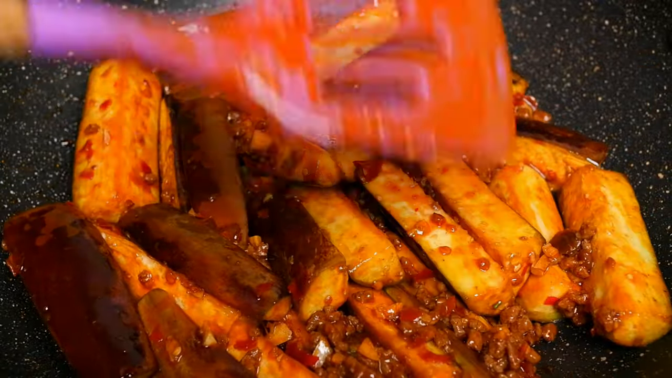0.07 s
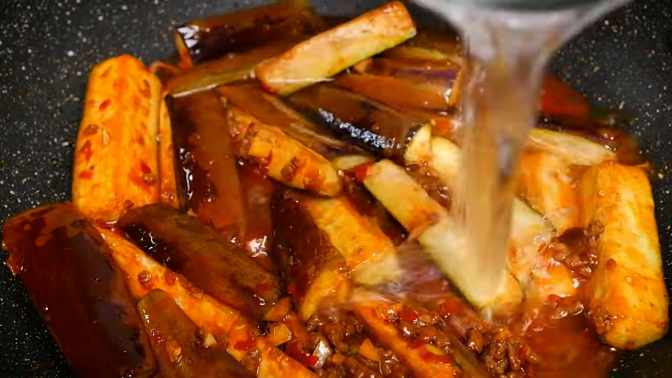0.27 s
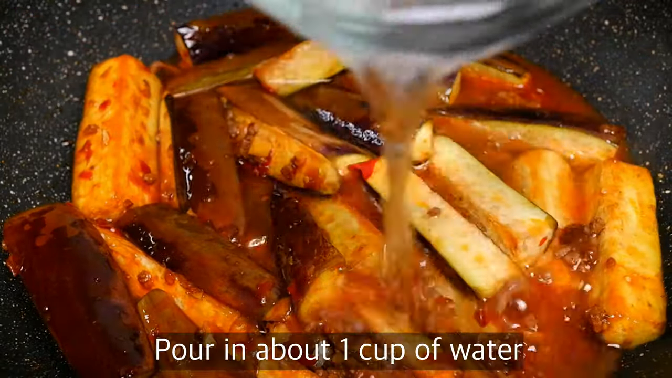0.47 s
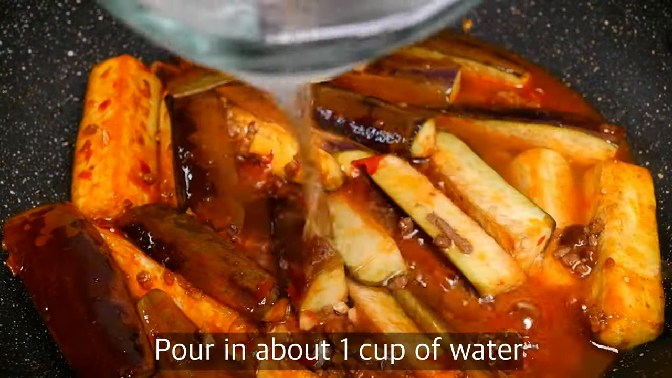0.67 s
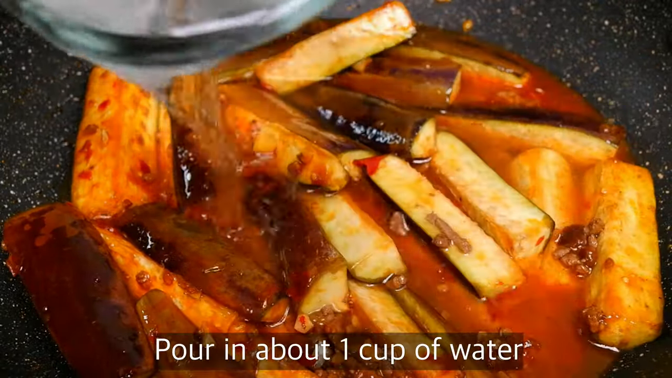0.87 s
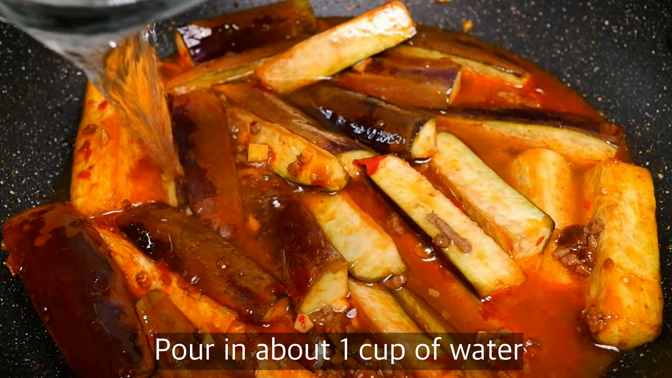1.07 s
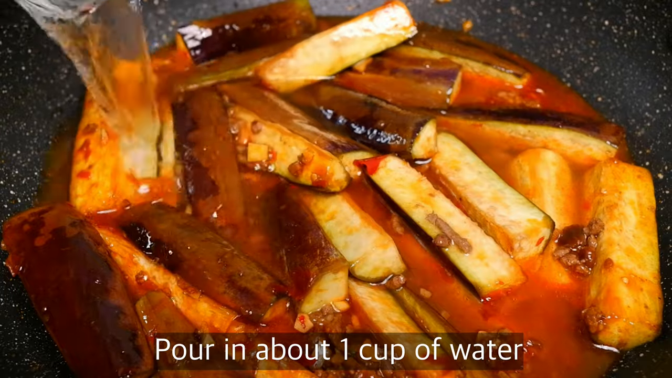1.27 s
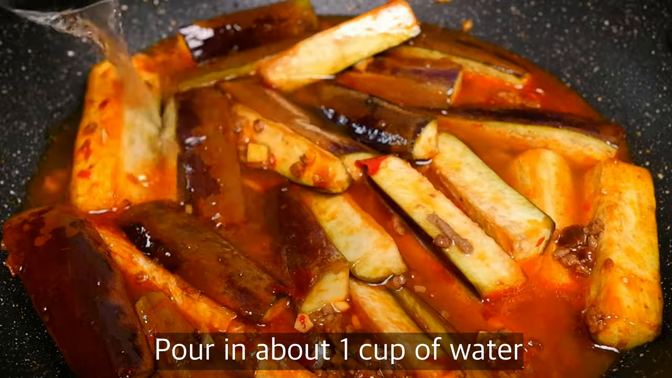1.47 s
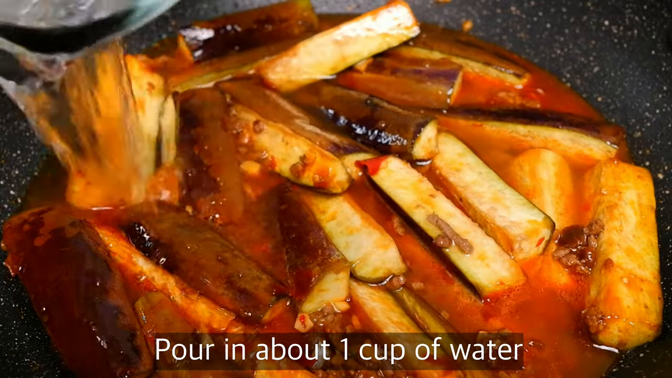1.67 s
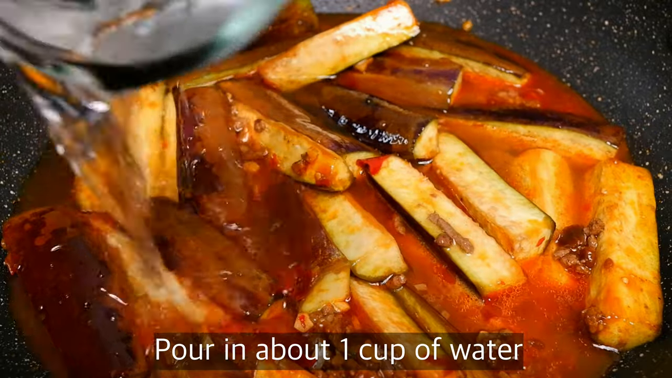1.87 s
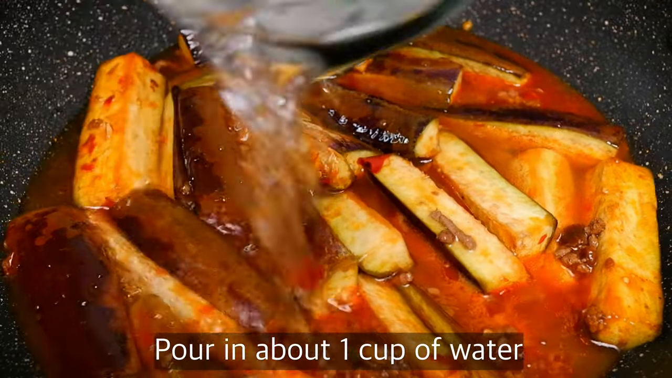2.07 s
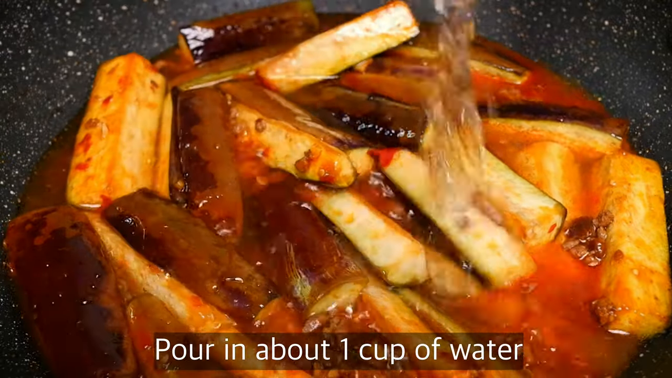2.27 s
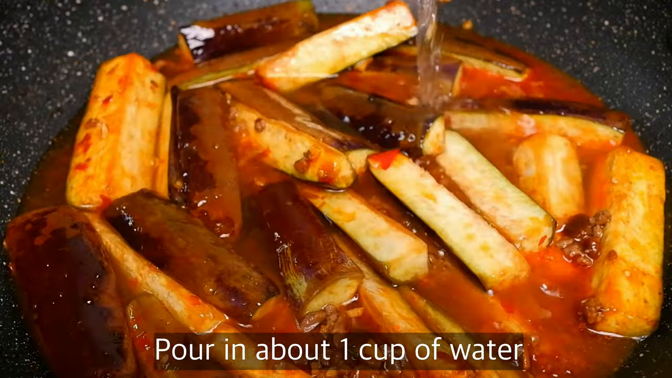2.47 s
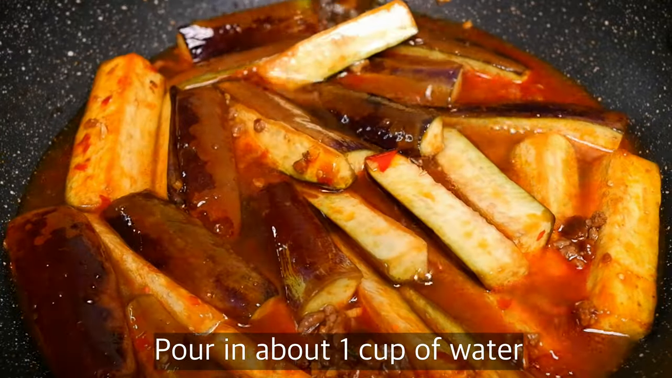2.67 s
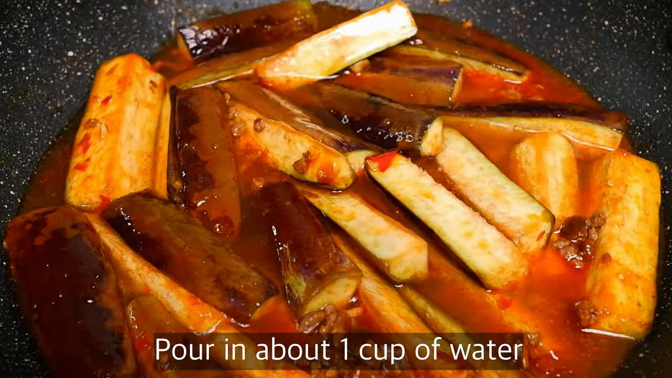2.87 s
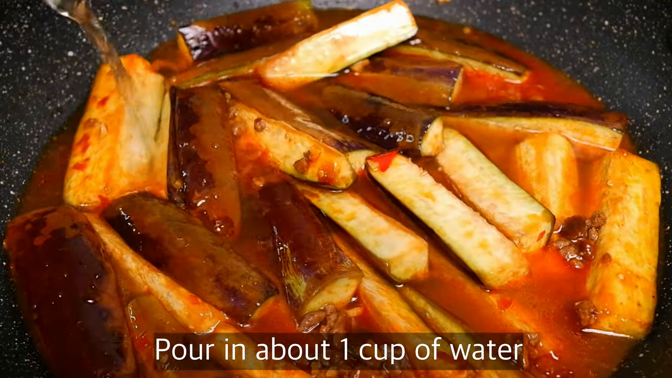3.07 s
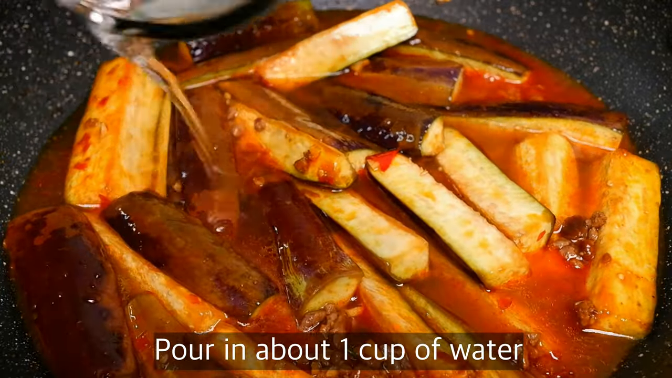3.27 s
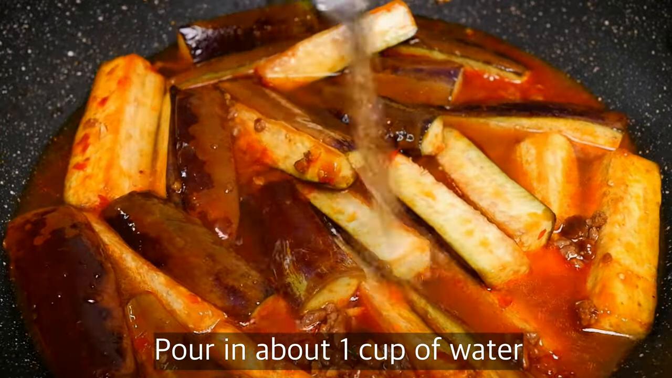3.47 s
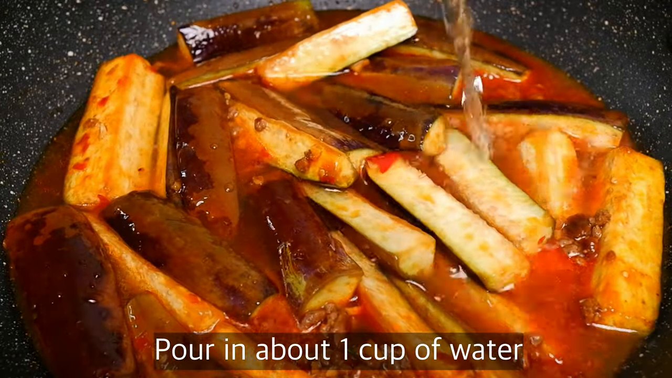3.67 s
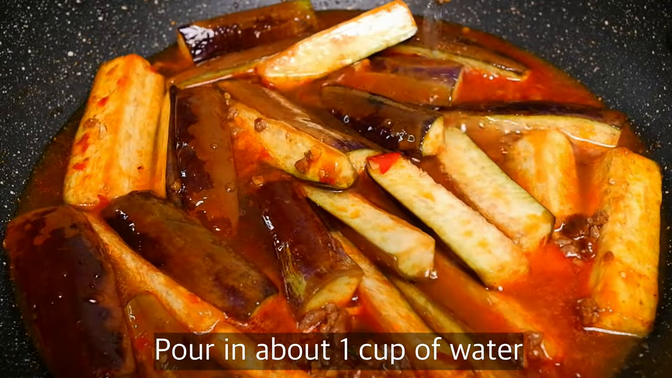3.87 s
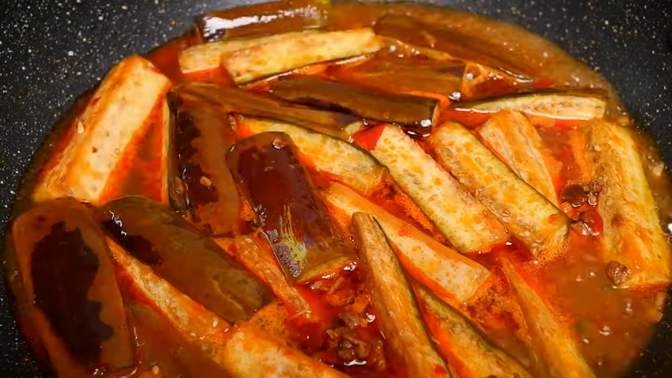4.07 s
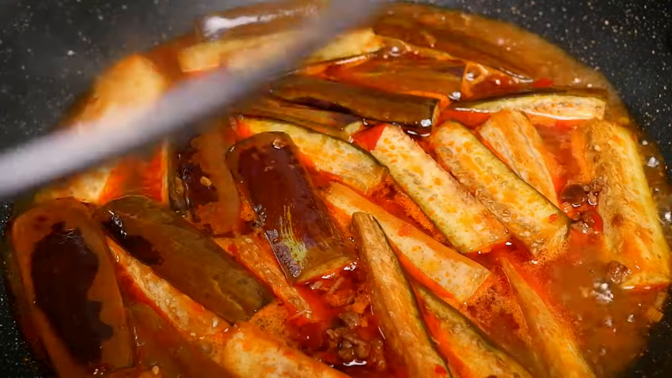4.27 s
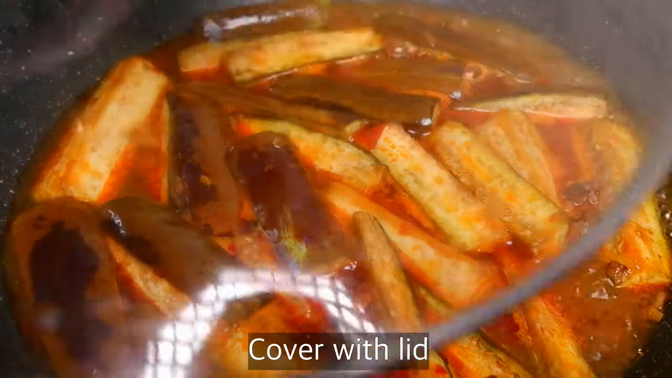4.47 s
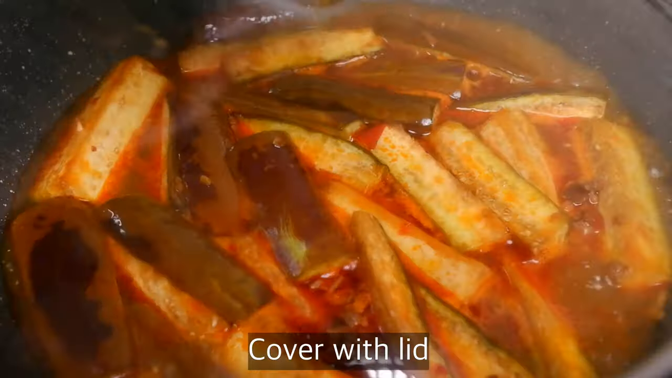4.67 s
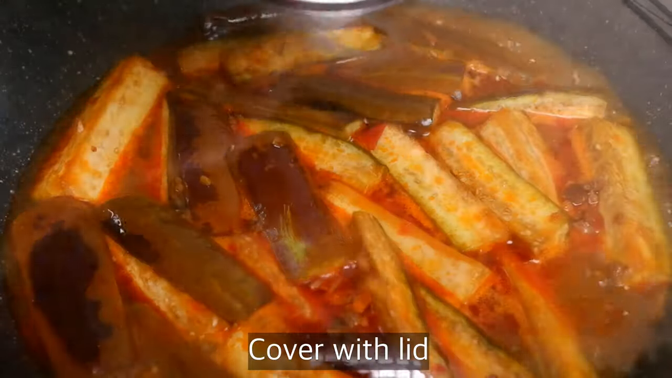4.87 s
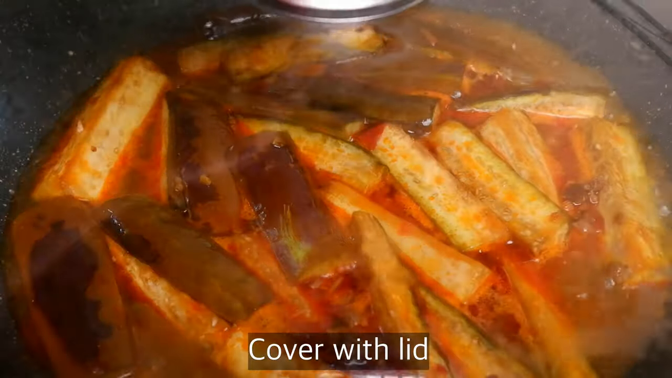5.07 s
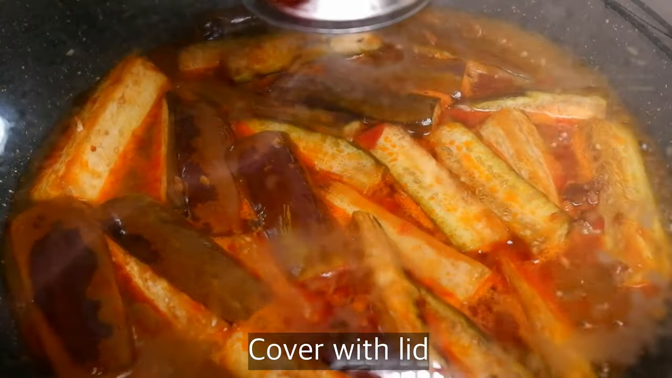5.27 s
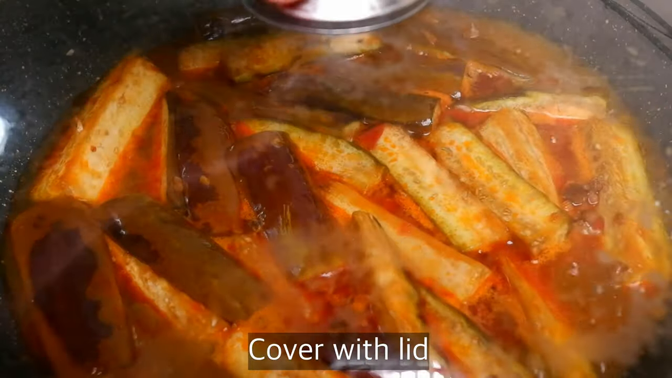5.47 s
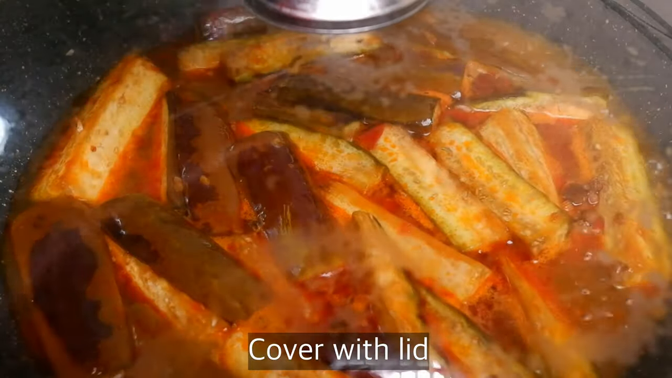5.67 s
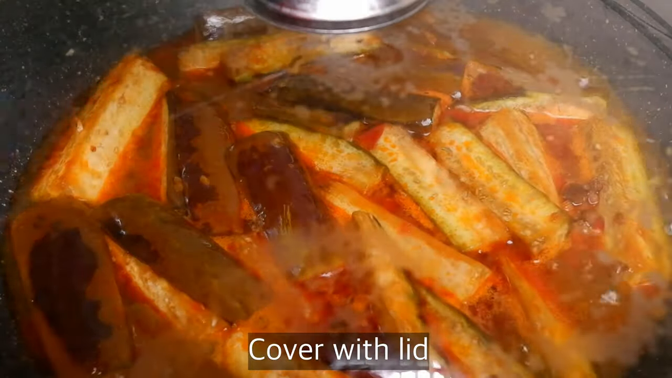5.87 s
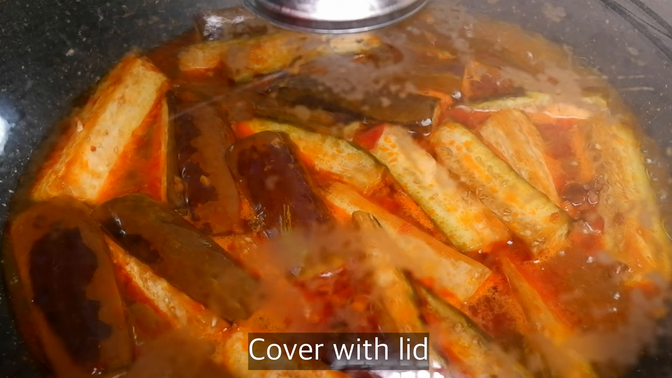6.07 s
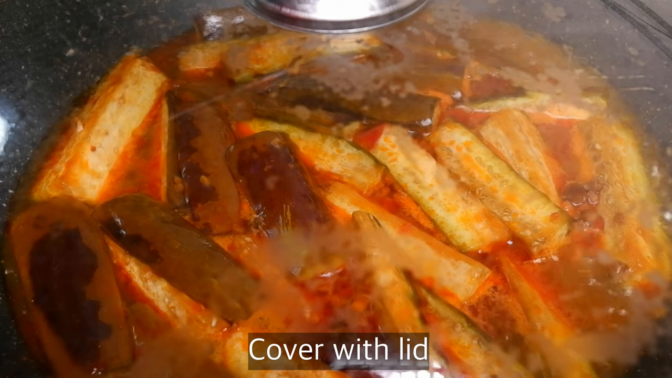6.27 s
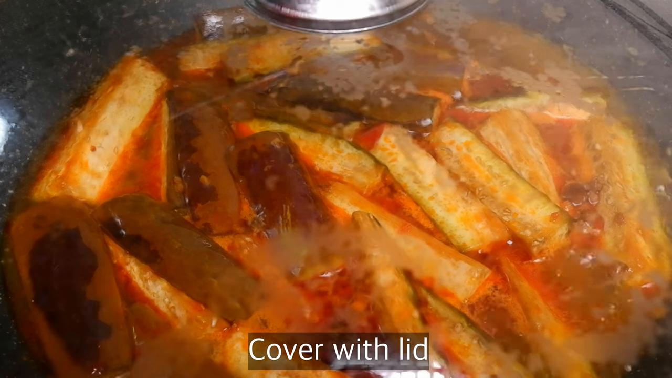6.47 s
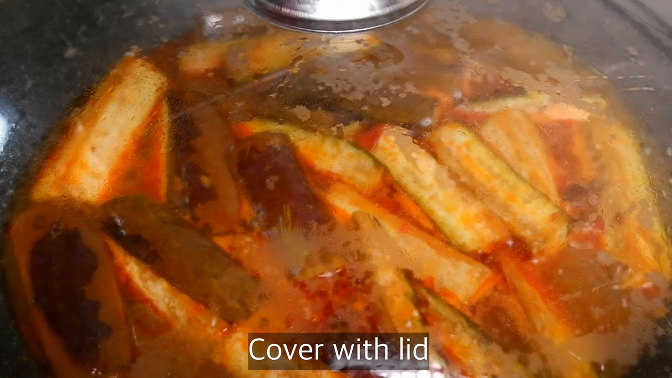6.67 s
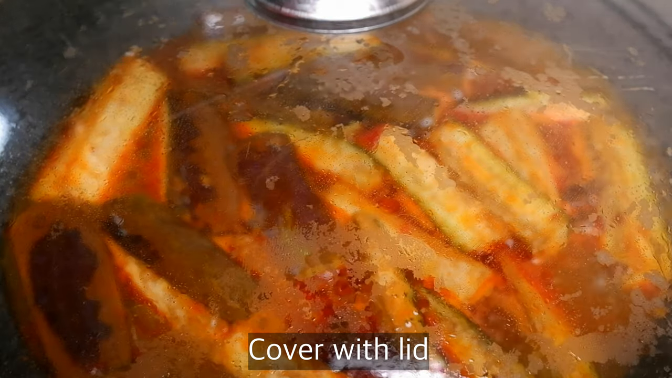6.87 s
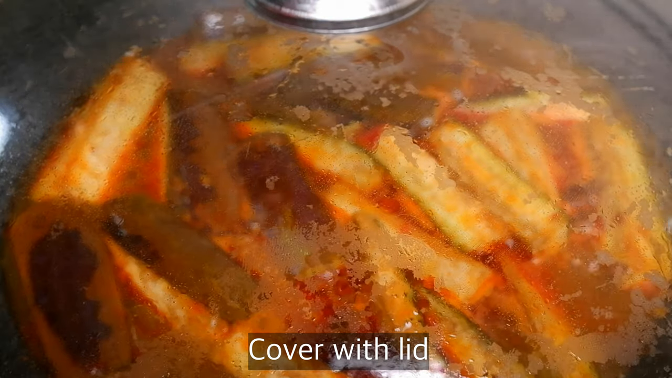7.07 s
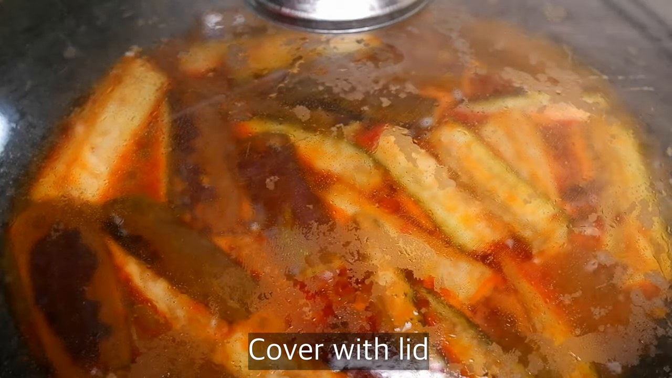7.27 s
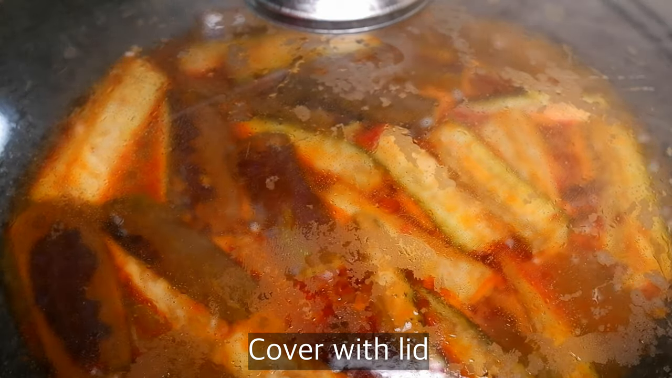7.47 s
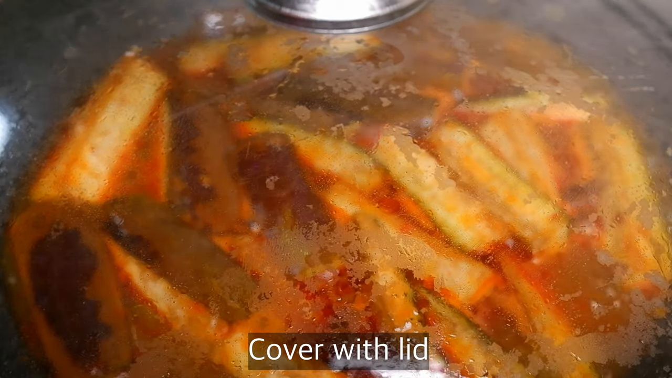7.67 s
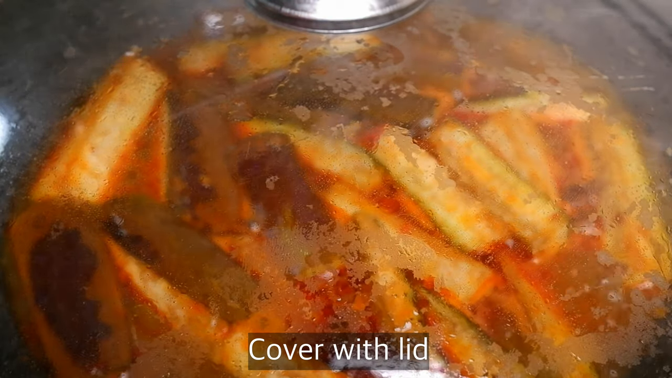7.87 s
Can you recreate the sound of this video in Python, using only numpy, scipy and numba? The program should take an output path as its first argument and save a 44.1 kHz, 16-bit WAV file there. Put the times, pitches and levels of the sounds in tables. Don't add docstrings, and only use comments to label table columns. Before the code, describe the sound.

A brief burst of strong frying cuts abruptly to water poured into a hot pan: much quieter fizz, sharp pops, tiny ringing drips and low fan hum. Another cut brings a lid knocking against the rim, quick rattling touches and one firm final clack. Bubbling then turns low and muffled beneath glass, with thin hissing gas. Small kitchen, close and nearly mono camera sound, little echo, weak treble dropping out.

```python
import sys
import numpy as np
from scipy import signal
from scipy.fft import rfft, irfft
from scipy.io import wavfile
from scipy.ndimage import uniform_filter1d
from numba import njit

SR = 44100
rng = np.random.default_rng(int(sys.argv[2]) if len(sys.argv) > 2 else 0)


def wrap_up_sound(samples):
    columns = np.atleast_2d(samples).T
    tamed = np.clip(columns, -1, 1)
    steps = np.round(tamed * 32767).astype(np.int16)
    wavfile.write(sys.argv[1], SR, steps)


def volts_from_db(level):
    exponent = np.asarray(level, float) / 20
    return 10 ** exponent


N = 349708
T = np.arange(N) / SR
HZ = np.fft.rfftfreq(N, 1 / SR)

JOINS = [
    .3005,
    4.1045,
]
OPEN = T < JOINS[1]

# (frequency [Hz], level [dB per Hz])
FRYING_TONE = [(240, -38), (400, -8), (489, -7.5), (520, -5.5), (904, -0.5), (1070, -1.5), (1920, -2.5),
               (2650, -5.5), (4910, -2), (9080, -6), (10900, -11), (15600, -14), (15900, -29)]
# (time [s], level [dB])
COOLING = [(0.31, -35), (0.57, -35.5), (1.06, -40), (1.4, -41.5), (1.96, -42.5), (2.25, -41), (2.75, -42.5),
           (3.36, -44), (3.5, -44.5), (3.93, -44), (4.09, -43)]
FRYING_DB, FRYING_SAG_DB_PER_S = -29.5, -6.5

# (frequency [Hz], level [dB per Hz])
FAN_TONE = [(12, -50), (20, -18), (91, -9.5), (151, -3.5), (240, -8), (295, -4), (328, -3.5), (410, -5),
            (448, -5.5), (490, -11), (700, -24), (910, -57), (1540, -120)]
# (frequency [Hz], width [Hz], gain [dB])
FAN_ROOM_RESONANCES = [(131.8, 8.9, 6), (165.3, 6.2, 7), (195, 10, 5), (239.8, 10.6, 9.5)]
# (time [s], share [dB])
HUM_SWELL = [(0, -3), (0.44, 0), (1.05, 3), (2.25, -7), (2.42, 9), (2.89, 8), (3.3, -2), (3.5, 9),
             (4.09, -8)]

# (frequency [Hz], level [dB per Hz])
MIC_NOISE_TONE = [(12, -26), (20, 2), (80, 2), (365, 3), (1600, -1), (6840, -8), (7860, -11), (15800, -5)]

# (time [s], peak [dB])
FAT_CRACKS = [(0.0913, -11), (0.1901, -10), (0.7289, -19), (0.831, -28), (0.9823, -19), (1.1737, -28),
              (1.2124, -26), (1.2495, -26.0), (1.5554, -24), (1.7738, -25), (1.8423, -21), (2.0746, -27.0),
              (2.2502, -25), (2.4985, -19), (2.7007, -24), (2.828, -25), (2.8616, -22), (2.9468, -29),
              (2.979, -27.0), (3.052, -25), (3.0599, -24), (3.0629, -22), (3.0795, -23), (3.1021, -18.5),
              (3.2565, -19.5), (3.2865, -21), (3.3121, -24), (3.3956, -26), (3.55, -21), (3.5533, -18),
              (0.868, -20), (0.789, -24), (2.4, -23), (2.636, -26), (2.74, -27), (3.5946, -22),
              (3.6311, -34), (3.6426, -33), (3.6599, -30), (3.6828, -28.0), (3.6858, -29.0), (3.7551, -22),
              (3.7705, -24), (3.8254, -29.0), (3.8377, -27), (3.8548, -30.0), (3.8764, -27), (4.0602, -31),
              (4.083, -31.0), (4.0882, -29), (4.0922, -35), (4.0977, -22)]
# (time [s], peak [dB], pitch [Hz], share of broad click [dB])
SPITS = [(0.286, -14, 2280, -9), (0.391, -17, 3900, -12), (0.561, -24, 4200, -5), (0.622, -17, 3920, -3),
         (0.681, -19, 7350, -5), (0.6843, -23, 2480, 8), (0.686, -27, 2180, 1), (0.7065, -14, 5000, -9),
         (0.874, -19, 5400, -7), (0.9587, -19, 1350, -14), (0.984, -25, 5700, -1), (1.0785, -22, 5490, 3),
         (1.713, -24, 5910, -8), (1.905, -18, 5770, -14), (2.143, -30, 4600, -13), (2.1705, -21.5, 760, 2),
         (2.2185, -16, 2700, -7), (2.228, -17, 3600, -17), (2.2645, -19.5, 3740, -20),
         (2.348, -23, 2140, -8), (2.385, -24, 5300, -2), (2.473, -24, 3020, -13), (2.656, -25, 990, -9),
         (2.803, -23, 4770, -18), (2.248, -26, 3000, -10), (3.1902, -25, 2390, -3), (3.554, -27, 1100, 8.5),
         (3.747, -27, 2070, -7), (3.888, -23.5, 960, -9), (4.0256, -12.5, 7600, -5)]
# (time [s], peak [dB], pitch [Hz], length [cycles])
RINGING_DRIPS = [(0.578, -37, 880, 8), (2.1403, -29, 4070, 22), (2.209, -36, 2900, 6),
                 (2.223, -35, 2200, 5), (2.2475, -35, 3100, 12), (3.542, -37, 2100, 6),
                 (3.671, -43, 2350, 10), (0.591, -30, 3400, 5), (0.575, -32, 2100, 4), (2.34, -35, 2280, 7),
                 (2.361, -34, 2720, 10), (2.49, -43, 1000, 7), (2.63, -46, 940, 22), (2.944, -39, 1280, 5),
                 (2.945, -36, 2300, 6), (3.392, -40, 6100, 30), (3.454, -40, 7750, 35),
                 (3.68, -38.5, 2290, 15), (3.845, -36, 8300, 15), (3.853, -39, 5960, 16)]
# (middle [s], half length [s], frequency [Hz], width [Hz], level [dB])
SPLASHES = [(2.54, .09, 4950, 900, -53), (2.221, .004, 5600, 3000, -42), (2.635, .025, 4700, 1300, -48),
            (2.5, .008, 4200, 600, -50), (3.595, .005, 4200, 1500, -48), (2.83, .035, 4800, 600, -53),
            (2.66, .004, 3500, 4000, -48)]

# (frequency [Hz], level [dB per Hz])
BOILING_TONE = [(12, -61), (20, -28), (48, -54), (80, -6), (127, -11), (150, -2), (284, -7.5), (344, -2.5),
                (526, -3), (624, -14.5), (788, -19), (1110, -7), (1430, -16), (2330, -21), (3200, -32),
                (4160, -50), (7040, -120)]
# (frequency [Hz], width [Hz], gain [dB])
COVERED_RESONANCES = [(161, 6.8, 4), (194, 8.8, 4), (235.6, 11, 7.5), (285.4, 10.7, 11.5)]
# (frequency [Hz], width [Hz], level [dB])
JET_WHISTLES = [
    (6886, 420, -0.5),
    (7104, 540, 0.5),
]
# (frequency [Hz], level [dB per Hz])
MUFFLED_TONE = [(1530, 1), (2600, 0), (2960, -9), (6100, -8.5), (6990, -7), (8380, -7.5), (11100, -11),
                (12700, -17.5), (14800, -10.5), (15800, -17)]
# (time [s], opening [about 0 closed to 1 open])
LID_GAP = [(4.11, 1.8), (4.25, 0.92), (4.5, 1.02), (4.89, 1.4), (5.1, 0.87), (5.35, 0.76), (5.51, 0.2),
           (5.8, 0.067), (7.93, 0.055)]
# (time [s], peak [dB], pitch [Hz])
DROPLETS = [(4.583, -42, 10500), (4.645, -46, 11000), (4.687, -45, 4800), (4.734, -38, 12000),
            (4.751, -36, 10000), (4.275, -40, 9800), (4.955, -40, 5500), (5.199, -40, 4770),
            (6.394, -45, 9500), (7.21, -43, 9500)]
ROCKING_S, ROCKING_WIDTH_S, ROCKING_DB = 5.33, 0.15, 5

# (time [s], blow [dB], glass share [dB], crack share [dB], off-centre tilt [dB])
KNOCKS = [(4.359, -42, 8.5, -13, 2), (4.607, -33.5, -17, -11, 0), (4.955, -47, 2, 3, 2),
          (4.983, -21.5, -5, -1, 6), (4.9862, -23, -6, -5, 5), (4.9888, -28, 15, 2, 5),
          (5.015, -34, -8, -14, 5), (5.024, -39, 7, -12, 3), (5.035, -40, 7, -15, 0),
          (5.091, -37, -3, -15, 3), (5.1635, -44, 8, -20, 3), (5.1662, -42, 9, -20, 3),
          (5.1853, -22, -15, -20, 6), (5.2005, -40, 2, -10, 0), (5.2195, -31, 0, -5, 3),
          (5.2215, -30, 2, -4, 2), (5.2238, -22.5, -10, -14, -4), (5.2345, -38, 6, -18, 0),
          (5.2615, -31, -16, -22, -3), (5.2702, -37, 6, -10, 2), (5.2738, -35, 3, -10, 2),
          (5.285, -34, -8, -18, 3), (5.3257, -22, -16, -24, 5), (5.3335, -28, -14, -22, -3),
          (5.3515, -33, -5, -10, 0), (5.375, -12.5, 2.5, -17, -1), (5.3777, -22, 4, -3, 0),
          (5.414, -39, 5, -10, 0), (6.812, -35, -11, -31, 0), (7.762, -41, -13, -18, 0)]
# (start [s], first level [dB], fading [dB per s], glass share [dB])
TREMBLES = [
    (5.04, -42, -65, -2),
    (5.292, -39, -30, -6),
    (5.39, -38, -22, -8),
]
# (frequency [Hz], level [dB], time to fade 60 dB [s])
PAN = [(156, -24.5, 0.86), (169, -14, 0.065), (211, -5.5, 0.099), (280, 2.5, 0.045), (365, 0, 0.045),
       (420, -8.5, 0.071), (517, -7, 0.028)]
# (frequency [Hz], level [dB], time to fade 60 dB [s])
GLASS = [(625, -15, .025), (830, -4.5, .025), (975, -4, .025), (1145, 4.5, .036), (1255, -7, .022),
         (1380, -22, .025), (1700, -20, .02), (2400, -21, .02), (2650, -21, .02), (3140, -19, .02)]
# (middle [s], half length [s], frequency [Hz], width [Hz], level
# [dB])
SCRAPES = [(5.02, 0.03, 3200, 2500, -52), (4.992, .007, 4700, 1500, -46), (5.248, .01, 3300, 1500, -59),
           (5.29, 0.018, 2900, 450, -58), (4.5, 0.014, 3800, 1500, -55), (5.38, 0.005, 3100, 690, -46),
           (5.405, .02, 2300, 1400, -53), (5.1, 0.037, 2500, 660, -70), (5.24, .025, 110, 40, -45),
           (5.33, 0.028, 126, 62, -45), (5.3, .03, 282, 40, -46), (5.23, 0.027, 60, 40, -55),
           (5.43, 0.034, 190, 24, -35.5), (6, 0.022, 207, 36, -49), (5.48, 0.036, 196, 36, -46.5),
           (5.47, 0.034, 350, 30, -48), (4, 0.036, 4700, 3000, -69)]
# (frequency [Hz], width [Hz], level [dB])
ROOM_MODES = [(163.4, 5.4, 1), (193, 7, -6), (236, 8, 1), (292, 5.7, -9)]

# (start [s], length [s], affected above [Hz])
DROPOUTS = [(1.795, .035, 10400), (1.976, .021, 10500), (2.135, .025, 10500), (2.56, .033, 10500),
            (2.63, .023, 11000), (2.764, .021, 11000), (3.327, .062, 10100), (3.538, .011, 10000),
            (3.635, .053, 11000), (3.733, 0.036, 11000), (4.012, .012, 10000), (4.324, .045, 2800),
            (4.88, 0.033, 2800), (5.683, 0.036, 1890), (5.863, .03, 2660), (6.095, 0.047, 1680),
            (6.728, 0.036, 2700), (6.977, 0.036, 1790), (7.28, .035, 2000), (7.778, .035, 2680)]
# (frequency [Hz], level [dB per bin])
SILENCE_BELOW = [(8000, -112), (11000, -99), (12500, -94.5), (13500, -95.5), (15000, -97), (15500, -97),
                 (15800, -91)]
# (middle [s], half length [s], frequency [Hz], width [Hz], level [dB])
STEREO_BURSTS = [(.29, 0.0083, 4000, 9000, -50), (1.0, .015, 13500, 4000, -67),
                 (3.556, .009, 5500, 7000, -51), (4.026, .008, 6000, 12000, -56),
                 (4.988, 0.0068, 5000, 12000, -56)]


def level(x, db):
    return x * volts_from_db(db) / np.sqrt(np.mean(x ** 2))


def curve(rows):
    s, value = np.transpose(rows)
    return np.interp(T, s, value)


def samples(s):
    return (s * SR).astype(np.int64)


def shape(points, hz):
    f, db = np.transpose(points)
    return volts_from_db(np.interp(np.log(hz + 1), np.log(f), db))


def peak(hz, width):
    return 1j * HZ * width / (hz ** 2 - HZ ** 2 + 1j * HZ * width)


def resonances(modes):
    return 1 + sum(volts_from_db(db) * np.abs(peak(f, w)) ** 2 for f, w, db in modes)


def coloured_noise(response):
    return irfft(rfft(rng.standard_normal(N)) * response, N)


def band(x, lo_hz, hi_hz, order=2):
    return signal.sosfilt(signal.butter(order, [lo_hz, hi_hz], "band", fs=SR, output="sos"), x)


def walk(rate):
    k = int(SR / rate)
    steps = np.repeat(rng.standard_normal(N // k + 1), k)
    return 0.64 * uniform_filter1d(uniform_filter1d(steps, k), k)[:N]


@njit
def grains(start, hz, cycles, size, glide):
    out = np.zeros(N)
    for k in range(len(start)):
        n = int(cycles[k] * SR / hz[k])
        z, step = size[k] + 0j, 2 * np.pi * hz[k] / SR
        for i in range(start[k], min(start[k] + 5 * n, N)):
            z *= np.exp(1j * step * (1 + glide * (i - start[k]) / n) - 1 / n)
            out[i] += z.imag
    return out


def bubbles(count, lo_hz, hi_hz, colour, cycles, spread_db, most_db, glide):
    when, pitch, strength, length = rng.random((count, 4)).T
    hz = lo_hz * (hi_hz / lo_hz) ** pitch
    size = shape(colour, hz) * hz * volts_from_db(np.minimum(-spread_db * np.log(1 - strength), most_db))
    return level(grains((when * N).astype(np.int64), hz, cycles * (.5 + length), size, glide), 0)


def flutter(colour, lo_hz, count, swell_db, flicker_db, rate):
    out, swell = 0, np.tanh(walk(6.))
    white = rfft(rng.standard_normal(N)) * colour
    for k in range(count):
        part = np.clip(1 - np.abs(2 * np.log2((HZ + 1) / lo_hz) - k), 0, 1)
        flicker = np.clip(walk(max(rate, 10)), -2, 1)
        out = out + irfft(white * part, N) * volts_from_db(swell_db * swell + flicker_db * flicker)
    return level(out, 0)


def patches(rows):
    white = rfft(rng.standard_normal(N))
    out = 0
    for s, half, hz, width, db in rows:
        tone = level(irfft(white * peak(hz, width) ** 2, N), db)
        out = out + tone * np.exp(-((T - s) / half) ** 2)
    return out


def sizzle():
    hiss = flutter(shape(FRYING_TONE, HZ), 438, count=12, swell_db=1.0, flicker_db=2.0, rate=25.)
    fizz = bubbles(count=16000, lo_hz=588.5, hi_hz=14090, colour=FRYING_TONE, cycles=4.9,
                   spread_db=1.0, most_db=12.0, glide=0.036)
    spray = rng.standard_normal(400) * np.exp(-np.arange(400) / SR / .0012) * .45
    spray[0] = 1
    strength = volts_from_db(np.minimum(2.5 * rng.exponential(size=N), 12.))
    bursts = (rng.random(N) < .006) * rng.standard_normal(N) * strength
    crackle = level(irfft(rfft(bursts) * rfft(spray, N) * shape(FRYING_TONE, HZ), N), 0)
    mix = rfft(hiss + volts_from_db(-6.0) * fizz + volts_from_db(-10.0) * crackle)

    heat_db = np.where(T < JOINS[0], FRYING_DB + FRYING_SAG_DB_PER_S * T, curve(COOLING))
    cooling_db = 0.035 * (heat_db - FRYING_DB)
    low, top = HZ < 1900, HZ > 8500
    zones = [(~low & ~top, heat_db), (low, heat_db - 7 + cooling_db), (top, heat_db - 5.5 + cooling_db)]
    return sum(volts_from_db(db - 0.5) * level(irfft(mix * zone, N), 0) for zone, db in zones)


def hood():
    rumble = flutter(shape(FAN_TONE, HZ) * resonances(FAN_ROOM_RESONANCES), 19.3, count=12,
                     swell_db=-0.5, flicker_db=2.0, rate=7.3)
    hum = level(coloured_noise(peak(162.9, 2.6) ** 2), -14.0)
    return volts_from_db(-50.5) * (rumble + volts_from_db(curve(HUM_SWELL)) * hum)


def microphone_noise():
    return level(coloured_noise(shape(MIC_NOISE_TONE, HZ)), -62.5) * np.where(OPEN, volts_from_db(5), 1)


def fat_cracks():
    s, db = np.transpose(FAT_CRACKS)
    clicks = np.zeros(N)
    clicks[samples(s) - 1] = -volts_from_db(db + 6.5)
    return band(clicks, 1500, 8900, order=1)


def spits():
    s, db, hz, click_db = np.transpose(SPITS)
    cycles = 2.6 * (hz / 4000) ** .6
    ringing = grains(samples(s), hz, cycles, -volts_from_db(db - 5.0), 0.029)
    scatter = rng.standard_normal(600) * np.exp(-np.arange(600) / SR / 0.0016) * 0.25
    scatter[0] = 0.93
    clicks = np.zeros(N)
    clicks[samples(s)] = -volts_from_db(db + click_db + 5.5)
    return ringing + band(signal.fftconvolve(clicks, scatter)[:N], 700, 12500, order=1)


def ringing_drips():
    s, db, hz, cycles = np.transpose(RINGING_DRIPS)
    return grains(samples(s), hz, cycles, volts_from_db(db), .12)


def splashes():
    return patches(SPLASHES)


def boiling():
    boil_db = -47.5 + ROCKING_DB * np.exp(-((T - ROCKING_S) / ROCKING_WIDTH_S) ** 2)
    thrum = flutter(shape(BOILING_TONE, HZ) * resonances(COVERED_RESONANCES), 13.5, count=16,
                    swell_db=0.0, flicker_db=2.0, rate=14.0)
    plops = bubbles(count=2500, lo_hz=141.7, hi_hz=2800, colour=BOILING_TONE, cycles=3.7,
                    spread_db=-2.0, most_db=0.0, glide=0.046)
    return volts_from_db(boil_db) * (thrum + volts_from_db(-7.0) * plops)


def gas_jet():
    whistle = sum(volts_from_db(db) * peak(f, w) ** 2 for f, w, db in JET_WHISTLES)
    return volts_from_db(-58.5) * flutter(whistle, 3940, count=4, swell_db=2.0, flicker_db=2.5, rate=54.0)


def fizz_under_lid():
    gap = curve(LID_GAP)
    fizz = flutter(shape(MUFFLED_TONE, HZ), 2530, count=7, swell_db=.7, flicker_db=2.8, rate=40.)
    bursts = bubbles(count=1500, lo_hz=5000, hi_hz=12700, colour=MUFFLED_TONE, cycles=2.5,
                     spread_db=5.0, most_db=11.0, glide=0.023)
    both = rfft(fizz + volts_from_db(-9.5) * bursts)
    dull = level(irfft(both * (HZ < 8000), N), 0)
    steam = level(irfft(both * (HZ >= 8000), N), 0)
    s, db, hz = np.transpose(DROPLETS)
    ticks = grains(samples(s), hz, 3. + 0 * hz, volts_from_db(db), 0.027)
    return ticks + volts_from_db(-61 + 4.5 * gap) * dull + volts_from_db(-66 + 6 * gap) * steam


def touches(count=7):
    rows = list(KNOCKS)
    for s, db, fade_db, glass_db in TREMBLES:
        late, size = rng.random((count, 2)).T
        after = .018 * (np.arange(count) + .6 * late)
        rows += [(s + a, db + fade_db * a + 5 * (z - .5), glass_db, -25, 0) for a, z in zip(after, size)]
    return rows


def kitchen(x):
    t = T[:SR // 2]
    tail = band(rng.standard_normal(len(t)), 92, 5000, order=1) * volts_from_db(-60 * t / 0.42)
    tail = level(tail, 0) / np.sqrt(len(t))
    boom = irfft(rfft(x) * sum(volts_from_db(db) * peak(hz, w) for hz, w, db in ROOM_MODES), N)
    return volts_from_db(-17.5) * signal.fftconvolve(x, tail)[:N] + volts_from_db(4.) * boom


def lid():
    out, t = np.zeros(N), T[:SR // 2]
    rows = touches()
    chance = rng.standard_normal((len(rows), 2, len(PAN + GLASS)))
    f, mode_db, t60 = np.transpose(PAN + GLASS)[:, :, None]
    is_glass = f > PAN[-1][0]
    sense = np.where(is_glass, 1, (-1.) ** np.arange(len(f))[:, None])
    favoured = np.where((f > 320) & (f < 600), 1., -1. * (f < 900))
    push = np.hanning(int(.0005 * SR) + 3)
    for (s, db, glass_db, crack_db, tilt_db), (gain, detune) in zip(rows, chance):
        hit_db = mode_db + tilt_db * favoured + glass_db * is_glass + 1.2 * gain[:, None]
        pitch = f * (1 + .015 * detune[:, None])
        ring = sense * volts_from_db(hit_db - 60 * t / t60) * np.sin(2 * np.pi * pitch * t)
        ring = np.convolve(ring.sum(axis=0), push / push.sum())[:len(t)]
        crack = band(rng.standard_normal(len(t)), 900, 11000) * volts_from_db(crack_db - 60 * t / .06)
        crack = crack * np.minimum(t / 0.0006, 1)
        i = int(s * SR)
        out[i:i + len(t)] -= (volts_from_db(db - 6.5) * (ring + crack))[:N - i]
    return band(out + kitchen(out) + patches(SCRAPES), 97, 22000, order=3)


def random_blocks(rows, columns, tall, wide):
    values = rng.standard_normal((rows // tall + 1, columns // wide + 1))
    return np.repeat(np.repeat(values, tall, axis=0), wide, axis=1)[:rows, :columns]


def silence_weak_patches(x):
    f, t, z = signal.stft(x, SR, nperseg=1024, noverlap=768)
    size, is_open, bass = (len(f), len(t)), t < JOINS[1], f[:, None] < 900
    floor = np.repeat(shape(SILENCE_BELOW, f)[:, None], len(t), axis=1)
    floor[np.ix_(f > 10000, is_open)] = volts_from_db(-80.5)
    for s, length, above_hz in DROPOUTS:
        db = -72.5 if s < JOINS[1] else -79.8 if s < 5. else -77.5
        floor[np.ix_(f > above_hz, (t > s) & (t < s + length))] = volts_from_db(db)
    floor = floor * volts_from_db(2.5 * random_blocks(*size, 8, 6))

    blocks = random_blocks(*size, 24, 8)
    loudness = uniform_filter1d(uniform_filter1d(np.abs(z[0]) ** 2, size=24, axis=0), size=12, axis=1)
    side = np.maximum(volts_from_db(-100), volts_from_db(-15 + 4.5 * is_open) * np.sqrt(loudness + 1e-18))
    side = side * volts_from_db(4.5 * blocks + 3. * blocks[0] * (f[:, None] > 900) - 9.5 * bass)

    z = z * volts_from_db(2.5 * random_blocks(*size, 6, 2) * (f[:, None] > 2900))
    floor = np.array([floor, np.maximum(side, floor * (t > JOINS[1]))])
    patch = uniform_filter1d(uniform_filter1d(np.abs(z) ** 2, size=5, axis=-2), size=4, axis=-1)
    kept = z * np.where(patch > floor ** 2, 1, volts_from_db(-28.))
    return signal.istft(kept, SR, nperseg=1024, noverlap=768)[1][..., :N]


def scene():
    open_pan = sizzle() + hood() + fat_cracks() + spits() + ringing_drips() + splashes()
    covered_pan = boiling() + gas_jet() + fizz_under_lid() + lid()
    mid, side = np.where(OPEN, open_pan, covered_pan), microphone_noise()
    return np.array([mid + side, mid - side])


def roll_off(x):
    return signal.sosfilt(signal.butter(12, 16990, fs=SR, output="sos"), x)


def record(dry):
    fades = [np.clip(np.maximum((s - T) / .008, (T - s) / .004), 0, 1) for s in JOINS]
    left, right = irfft(rfft(dry * np.prod(fades, axis=0)) * (HZ < 15850), N)
    mid, side = silence_weak_patches(np.array([left + right, left - right]) / 2)
    side = side + patches(STEREO_BURSTS)
    return roll_off(np.array([mid + side, mid - side]))


dry = scene()
out = record(dry)
wrap_up_sound(out)
```